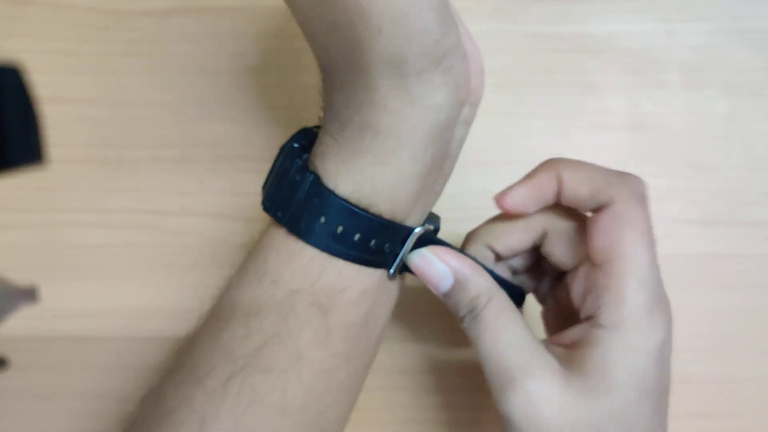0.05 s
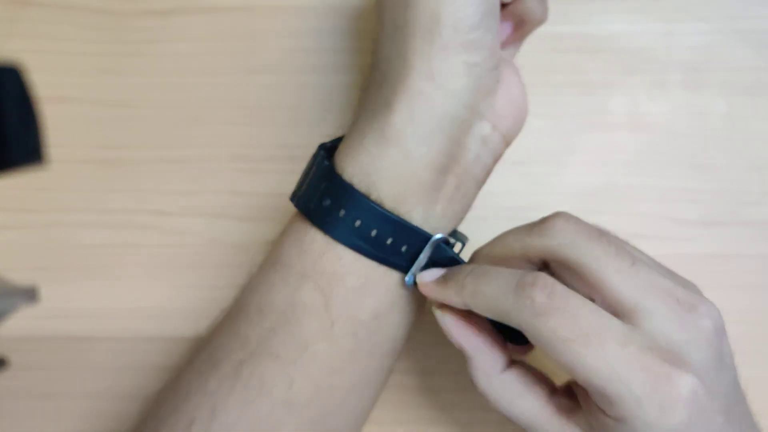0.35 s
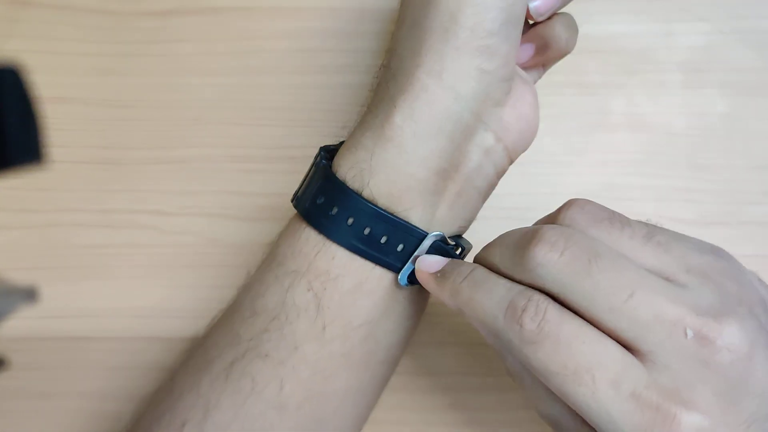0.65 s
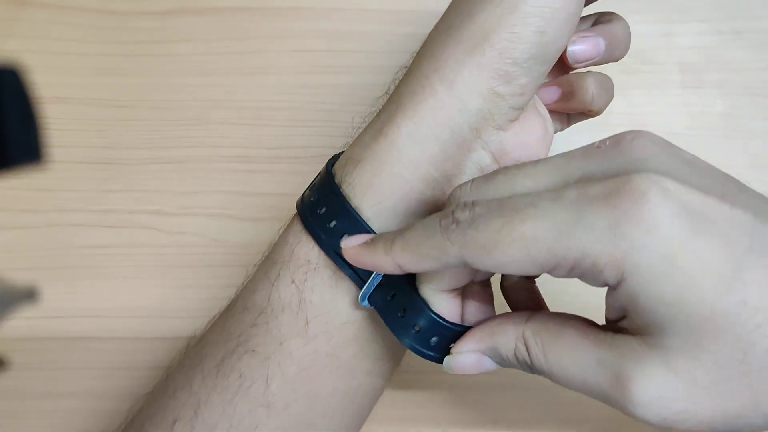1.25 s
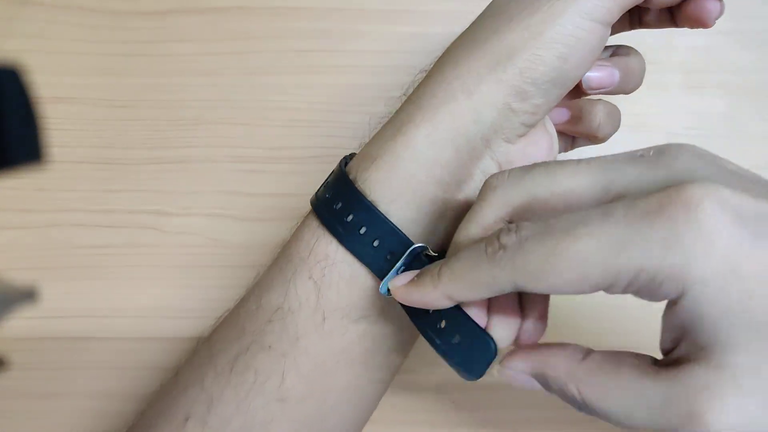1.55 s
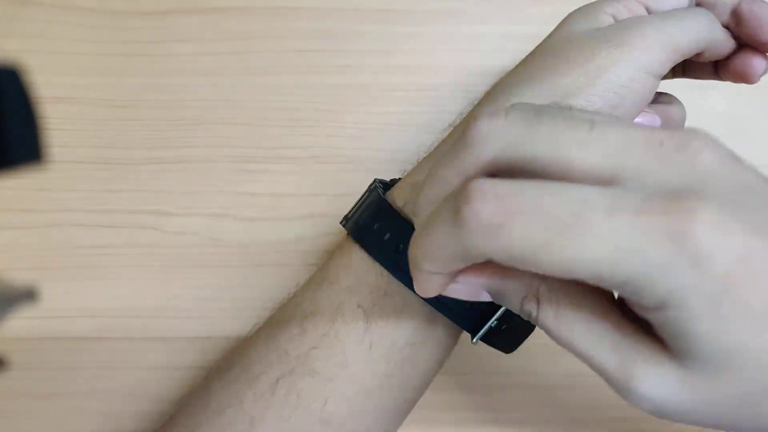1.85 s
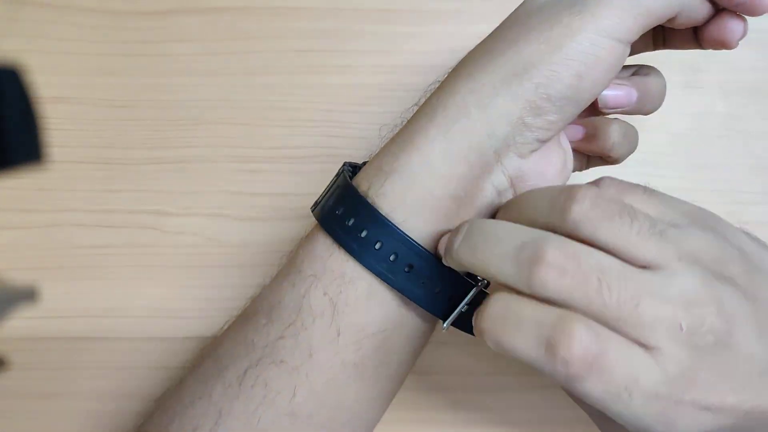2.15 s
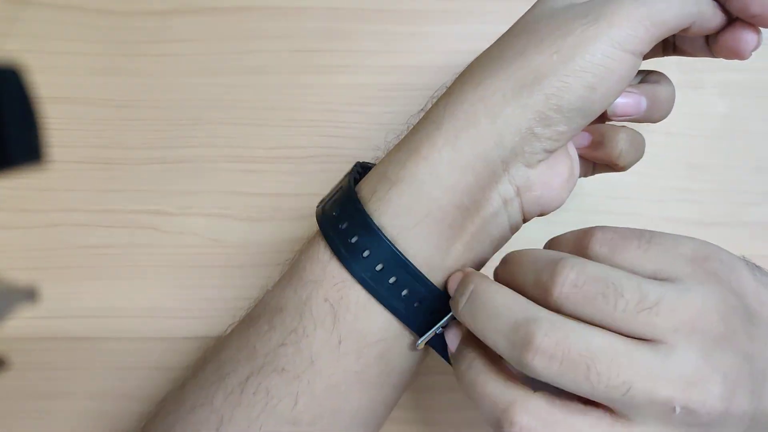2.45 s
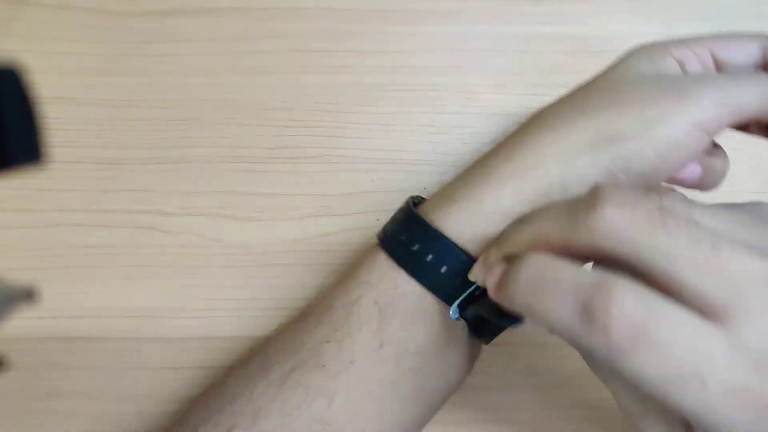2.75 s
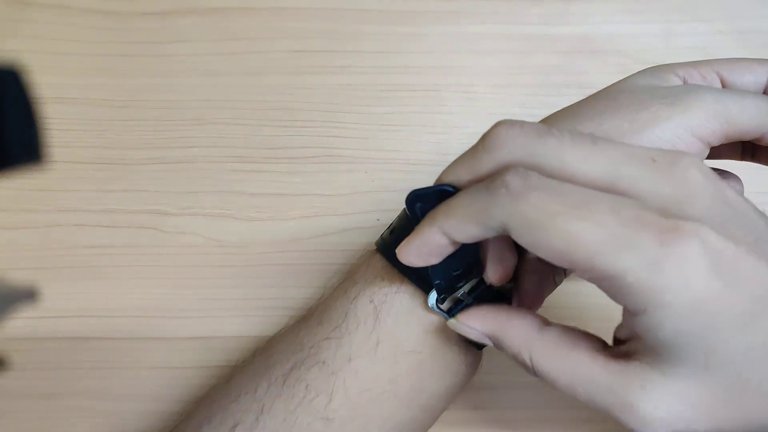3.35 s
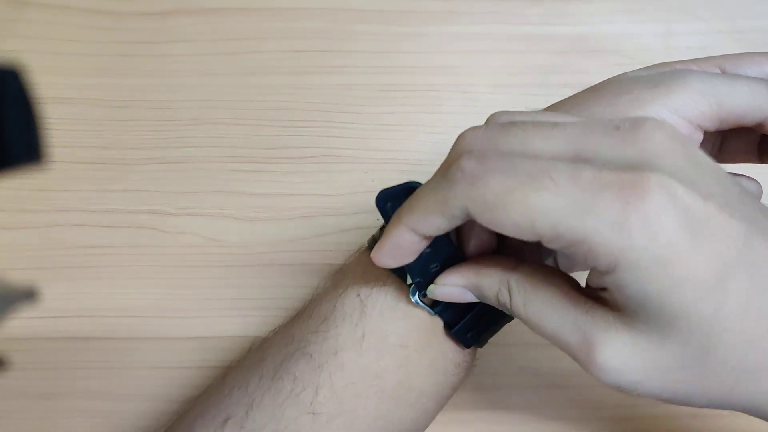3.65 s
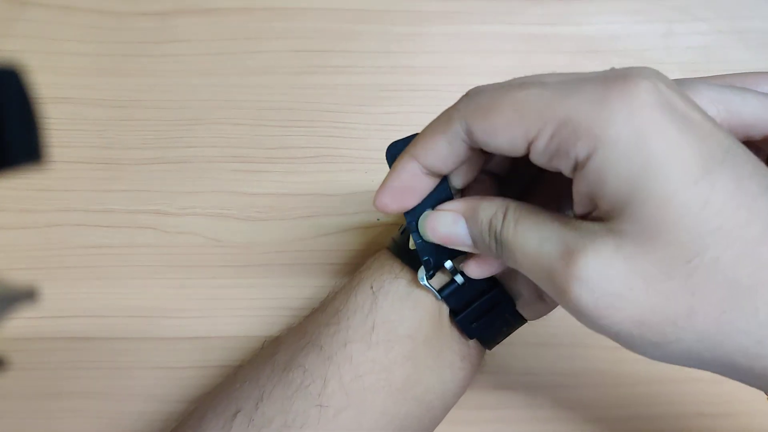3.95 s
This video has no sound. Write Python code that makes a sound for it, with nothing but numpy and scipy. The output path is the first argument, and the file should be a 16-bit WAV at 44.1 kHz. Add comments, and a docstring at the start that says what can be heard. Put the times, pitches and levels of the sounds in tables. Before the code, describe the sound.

A watch strap's metal buckle clicks twice sharply among faint ticks, over a fan's hum.

```python
"""Watch strap and buckle.

A resin strap is worked through its metal buckle, close up, over a desk in a small room.
The strap snaps against the frame and the pin drops in with a thin tick; each contact rings
the part's modes. Faint ticks and rubs come before and after. Behind, a fan hums and rumbles."""
import sys
import numpy as np
from scipy import signal
from scipy.fft import rfft, irfft
from scipy.io import wavfile

SR = 44100
rng = np.random.default_rng(int(sys.argv[2]) if len(sys.argv) > 2 else 0)


def transcribe(signal):
    """Save signal, clipped to [-1, 1], as a 16-bit WAV file at the path in sys.argv[1]."""
    frames = np.atleast_2d(signal).T
    limited = np.clip(frames, -1, 1)
    pcm = np.round(limited * 32767).astype(np.int16)
    wavfile.write(sys.argv[1], SR, pcm)


N = 176400
TILT_PIVOT_HZ = 6000


def strap_knocks():
    """The strap knocks on the buckle frame and rings it."""
    # Each row: start in seconds, level in dB, tilt in dB per octave.
    knocks = [(0.1000, -29.5, 8), (0.2752, -34, 9), (1.6368, -26, 10), (1.7542, -20, 6), (1.8166, 2, 3),
              (1.8183, -4, 1), (2.5150, -27, 0), (2.6122, -32, 5), (3.0902, -24.5, -2), (3.4758, -20, 1),
              (3.7872, -31, 8)]
    # Each row: frequency in Hz, level in dB, t60 in seconds, left minus right in dB.
    frame_modes = [(770, 1, .014, 6), (1125, 1.5, 0.011, 1), (1970, -6, .010, 11), (2630, -0.5, 0.0084, -4),
                   (3160, -3, 0.011, 14), (3670, 2, 0.011, -3), (4320, 1, 0.013, 17),
                   (5000, 6.5, 0.01, 6.5), (6300, 3.5, 0.0063, -4.5), (6880, 6.5, 0.016, -1),
                   (7340, 0, 0.0074, -7.5), (9900, -14.5, 0.0017, 7.5), (12600, -16, .003, 3),
                   (15300, -10, 0.0045, 4)]
    return struck(knocks, frame_modes)


def pin_ticks():
    """The pin touches the frame and rings thinly."""
    # Each row: start in seconds, level in dB, tilt in dB per octave.
    ticks = [(1.4930, -25, -1), (1.7540, -21, -6), (1.8832, -0.5, 1.5), (1.8840, -12.5, 2),
             (2.9650, -25, -2), (3.0640, -26, -2), (3.2108, -24, -1)]
    # Each row: frequency in Hz, level in dB, t60 in seconds, left minus right in dB.
    pin_modes = [(1090, -8, 0.0055, 8), (2620, -15, .005, 2), (4650, -17, 0.0055, 7), (7000, -7, .006, -10),
                 (8250, -8.5, 0.0071, 8.5), (9600, -13, 0.0068, 10), (10450, -17, .006, 10),
                 (12300, -10, .005, 2), (13500, -2.5, .006, 2), (14400, -2, .005, -2),
                 (15500, -3, .007, 12)]
    return struck(ticks, pin_modes)


def struck(hits, modes, scatter_db=2, right_lag_s=.00008):
    """Each contact rings all modes of a part, with its own loudness and brightness."""
    start_s, hit_db, tilt_db = np.transpose(hits)
    out = np.zeros((2, N))
    for k, (hz, mode_db, t60_s, pan_db) in enumerate(modes):
        level_db = hit_db + mode_db + tilt_db * np.log2(hz / TILT_PIVOT_HZ)
        level_db += scatter_db * rng.standard_normal(len(hits))
        clicks = np.zeros(N)
        clicks[(start_s * SR).astype(int)] = from_db(level_db)
        out += (-1) ** k * pan(pan_db) * resonate(clicks, hz, t60_s)
    return np.array([out[0], np.roll(out[1], round(right_lag_s * SR))])


def resonate(x, hz, t60_s):
    """One decaying mode, peak gain 1."""
    radius = from_db(-60 / (t60_s * SR))
    b = np.array([1, 0, -1]) * (1 - radius ** 2) / 2
    a = [1, -2 * radius * np.cos(2 * np.pi * hz / SR), radius ** 2]
    return signal.lfilter(b, a, x + 1e-18 * rng.standard_normal(N))


def strap_rubs(grains_per_s=6000, spread_db=3, pan_db=6):
    """Resin slips under the fingers in dense tiny grains that swell and fade with each push."""
    # Each row: centre and half length in seconds, relative level in dB, treble tilt in dB per octave.
    rubs = [(0.007, 0.011, -56, -4), (0.106, .008, -55, -3), (0.13, .018, -63, 2), (0.285, .015, -59, -2),
            (1.296, .009, -58, 0), (1.498, .009, -57, -3), (1.73, .010, -60.5, 0), (1.78, 0.025, -57, 1),
            (1.9, .003, -57, 3), (1.966, .008, -56, 6), (2.80, .09, -64, 5), (3.062, 0.011, -54, 1),
            (3.084, .014, -58, -3), (3.28, .018, -60, -5), (3.24, 0.057, -64, 0), (3.49, .018, -62, -2),
            (3.77, .02, -63, -2)]
    # Each row: frequency in Hz, gain in dB.
    colour = [(2000, -3), (4500, 0), (7000, -4), (10000, -5), (13000, 2), (15500, 3.5)]
    t, hz, out = np.arange(N) / SR, bins(N), 0
    grains = (rng.random(N) < grains_per_s / SR) * rng.choice([-1, 1], N)
    grain_db = spread_db * np.minimum(rng.exponential(1, N), 4)
    spectrum = rfft(rms_one(grains * from_db(grain_db))) * from_db(at_hz(colour, hz))
    for centre_s, half_s, db, tilt_db in rubs:
        tilt = from_db(tilt_db * np.log2(1 + hz / TILT_PIVOT_HZ))
        slip = rms_one(irfft(spectrum * tilt, N))
        push = np.exp(-((t - centre_s) / half_s) ** 2) / 2
        out += from_db(db) * push * slip
    return pan(pan_db) * out


def room(x, desk_db=-8.5, desk_decay_s=0.0019, build_s=0.0037):
    """Quick scatter from desk and hands, then a diffuse tail with its own decay in each band."""
    # Each row: band centre in Hz, level in dB, t60 in seconds.
    bands = [(800, -10, 0.31), (2000, -5.5, 0.46), (4500, -11, 0.44), (6670, -14.5, .38),
             (10000, -10, 0.41), (14500, -11, .32)]
    size = SR // 2
    t, hz = np.arange(size) / SR, bins(size)
    log_centres = np.log([row[0] for row in bands])
    noise = rfft(rng.standard_normal((2, size)))
    scatter = rng.standard_normal((2, size)) * np.exp(-t / desk_decay_s) * t
    response = from_db(desk_db) * rms_one(scatter)
    for share, (_, db, t60_s) in zip(np.eye(len(bands)), bands):
        fade = rms_one(from_db(-60 * t / t60_s) * (1 - np.exp(-t / build_s)))
        band = irfft(noise * np.interp(np.log(hz), log_centres, share), size)
        response += from_db(db) * fade * band
    return signal.fftconvolve(x, response / np.sqrt(size), axes=1)[:, :N]


def fan_air(mid_db=-39):
    """Steady rush and hiss of the fan: alike on both sides in the bass, diffuse above."""
    # Each row: frequency in Hz, relative spectral density in dB.
    colour = [(25, -20), (52, -9.5), (64, -6.5), (82, -6), (98, -11.5), (118, 0.5), (135, -3), (176, -6),
              (213, -6), (312, -19), (460, -21.5), (503, -23), (600, -22.5), (1110, -32), (1300, -34.5),
              (1900, -34.5), (2740, -41.5), (4300, -45.5), (4750, -45), (5000, -43), (5300, -50),
              (8440, -57), (14600, -51.5), (15700, -50)]
    # Each row: frequency in Hz, side minus mid in dB.
    width = [(60, -6.5), (120, -16), (240, -9), (480, -6.5), (950, 3), (1890, 1), (3770, 1), (7520, 0),
             (15000, 1)]
    # Each row: frequency in Hz, left minus right in dB.
    balance = [(60, 1.5), (180, 1.5), (550, 1.5), (1650, 2), (4970, 1.5), (15000, 3.5)]
    hz = bins(N)
    mid, side = rfft(rng.standard_normal((2, N))) * from_db(at_hz(colour, hz))
    side *= from_db(at_hz(width, hz))
    stereo = np.array([mid + side, mid - side]) * pan(at_hz(balance, hz))
    return from_db(mid_db) * irfft(stereo, N) / np.std(irfft(mid, N))


def fan_hum(rumble_db=-54, rumble_band_hz=(6.6, 44.7), pan_db=1.3):
    """Fan tones and the room resonances they drive waver in strength and phase over a deep rumble."""
    # Each row: frequency in Hz, level in dB, waver share from 0 to 1, half the drift corner in Hz.
    tones = [(42.75, -40.5, .3, 4.1), (72.1, -49.5, 0.71, 4.2), (134.7, -47, 0.88, 4.3),
             (211.9, -54, 0.937, 3.0), (583, -67, 0.69, 5), (920, -76.5, 0.83, 5.4),
             (4950, -82.5, 0.72, 8.9), (5120, -87.5, 0.91, 10.0)]
    t = np.arange(N) / SR
    bandpass = signal.butter(2, rumble_band_hz, "band", fs=SR, output="sos")
    out = from_db(rumble_db) * rms_one(signal.sosfilt(bandpass, rng.standard_normal(N)))
    for hz, db, waver, waver_hz in tones:
        wander = (drift(2 * waver_hz) + 1j * drift(2 * waver_hz)) / np.sqrt(2)
        swing = np.sqrt(1 - waver ** 2) + waver * wander
        carrier = np.exp(2j * np.pi * (hz * t + rng.random()))
        out += from_db(db) * rms_one(np.real(swing * carrier))
    return pan(pan_db) * out


def bass_swell(x, edge_hz=220, depth=0.88):
    """The bass rises and sinks by a few decibels."""
    # Each row: time in seconds, level in dB; depth scales its swing about the mean.
    contour = [(0.0, -36.5), (0.07, -36.5), (0.3, -40), (0.38, -35.5), (1.12, -40.5), (1.78, -35),
               (1.9, -39.5), (1.98, -35), (2.73, -38), (2.81, -32.5), (3.22, -37), (3.46, -35),
               (3.99, -38.5), (4.0, -38)]
    time_s, db = np.transpose(contour)
    bass = irfft(rfft(x) / (1 + (bins(N) / edge_hz) ** 4), N)
    gain_db = depth * np.interp(np.arange(N) / SR, time_s, db - db.mean())
    return x + bass * (from_db(gain_db) - 1)


def drift(corner_hz):
    """Slow random motion, rms 1."""
    return rms_one(irfft(rfft(rng.standard_normal(N)) / (1 + (bins(N) / corner_hz) ** 2) ** 2, N))


def from_db(db):
    """Decibels to gain."""
    return 10 ** (np.asarray(db) / 20)


def rms_one(x):
    """Scale to rms 1."""
    return x / np.sqrt(np.mean(x ** 2) + 1e-20)


def at_hz(points, hz):
    """Interpolate a curve over log frequency."""
    points_hz, values = np.transpose(points)
    return np.interp(np.log(hz), np.log(points_hz), values)


def bins(size):
    """FFT bin frequencies, at least 1 Hz."""
    return np.maximum(np.fft.rfftfreq(size, 1 / SR), 1)


def pan(db):
    """Left and right gains for a level difference."""
    return from_db(np.array([[.5], [-.5]]) * db)


def scene():
    """Buckle and strap in the room, over the fan."""
    fan = bass_swell(fan_air() + fan_hum())
    watch = strap_knocks() + pin_ticks() + strap_rubs()
    return watch + room(watch) + fan


def record(dry):
    """Steep low-pass."""
    cutoff_hz = 15900
    return signal.sosfilt(signal.ellip(12, .2, 90, cutoff_hz, fs=SR, output="sos"), dry)


dry = scene()
out = record(dry)
transcribe(out)
```